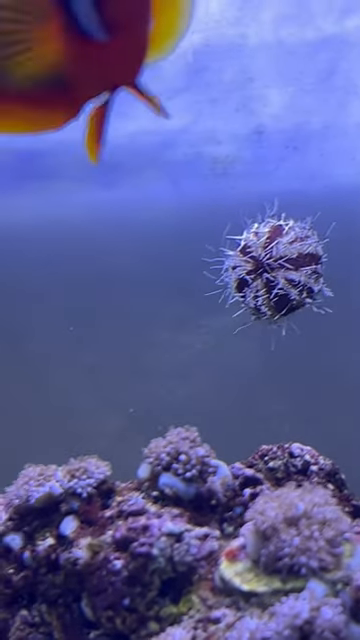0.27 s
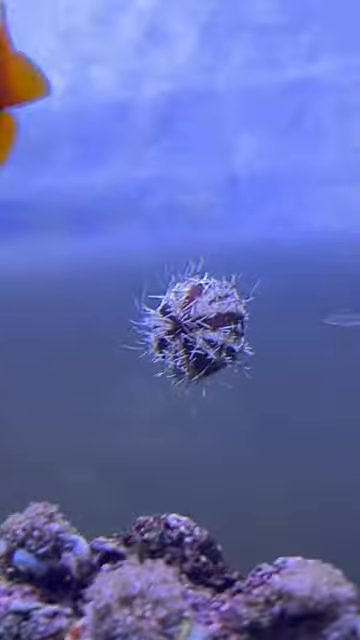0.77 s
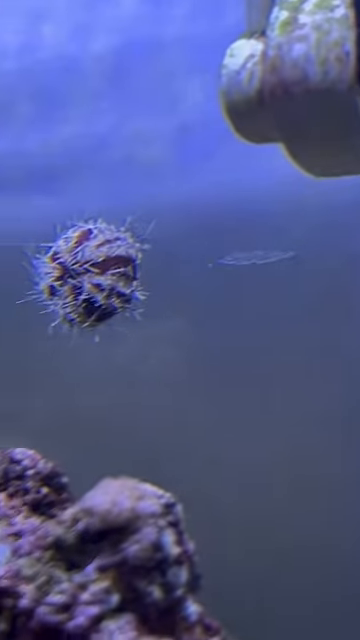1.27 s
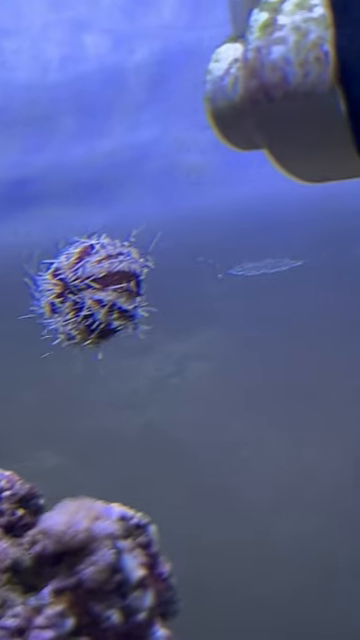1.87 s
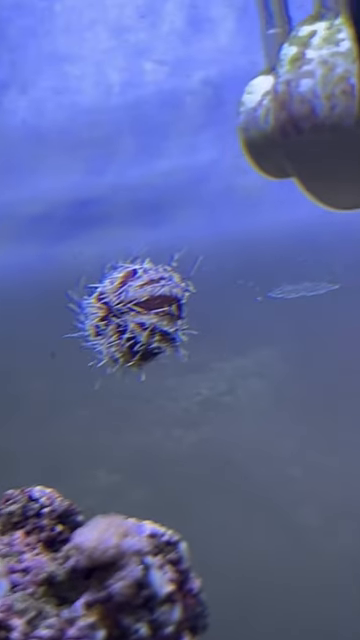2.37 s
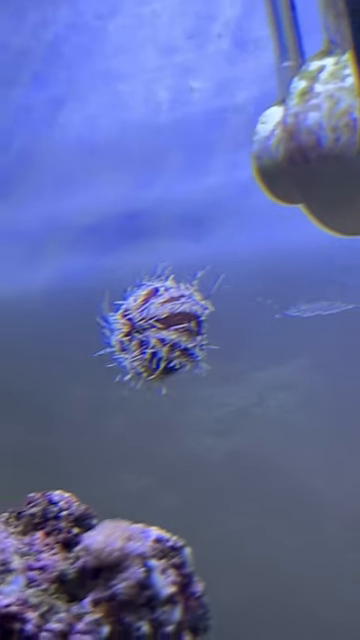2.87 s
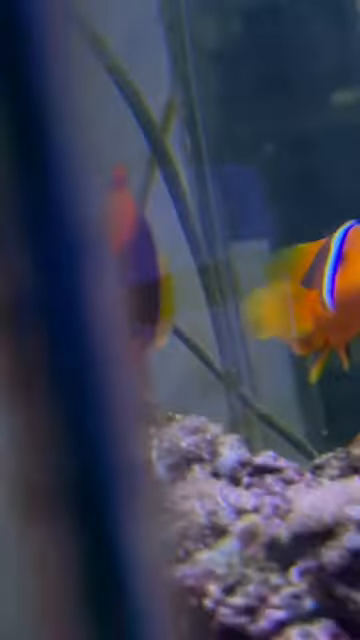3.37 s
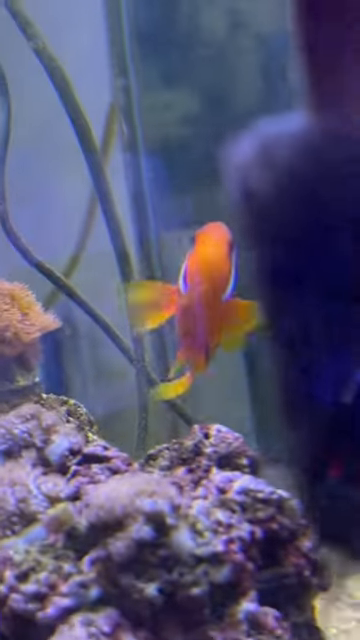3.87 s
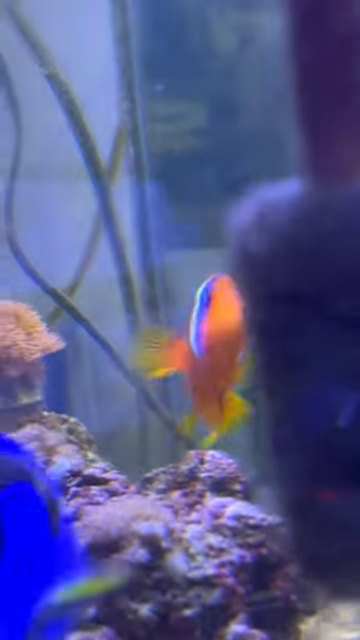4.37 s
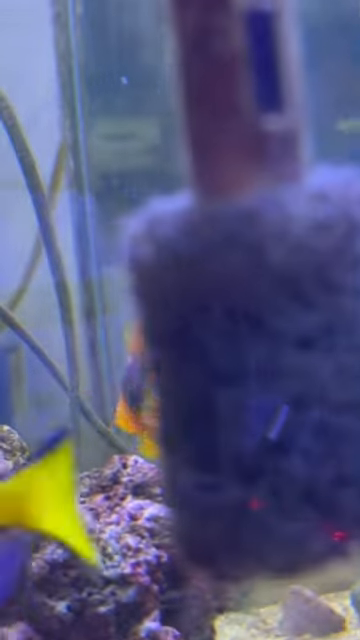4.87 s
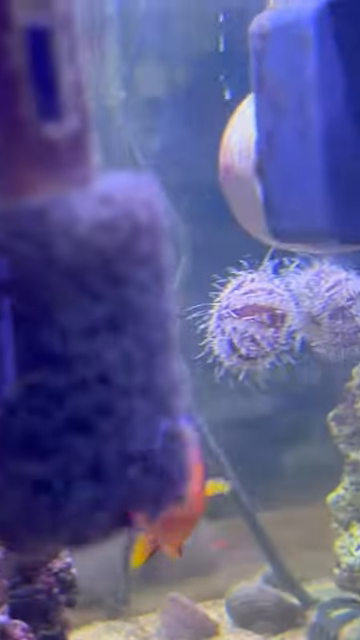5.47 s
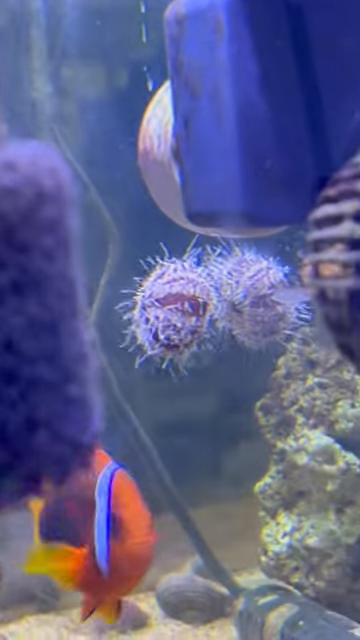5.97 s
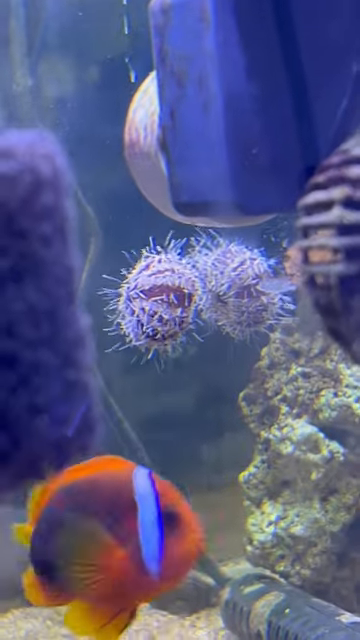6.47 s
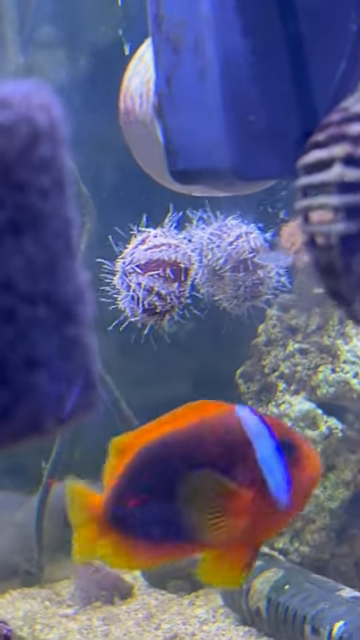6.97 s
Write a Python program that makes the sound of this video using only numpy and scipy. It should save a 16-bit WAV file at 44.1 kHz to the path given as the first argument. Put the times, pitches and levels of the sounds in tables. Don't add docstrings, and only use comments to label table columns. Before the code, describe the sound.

Close, deep electric pump hum with gentle running water; muffled through the walls, a heavy vehicle idles and accelerates with rising pitch near the end.

```python
import sys
import numpy as np
from scipy import signal
from scipy.fft import rfft, irfft
from scipy.io import wavfile
from scipy.ndimage import uniform_filter1d

SR = 44100
rng = np.random.default_rng(int(sys.argv[2]) if len(sys.argv) > 2 else 0)


def attenuation_scalar(level_db):
    decades = np.asarray(level_db, float) / 20
    return 10 ** decades


def store_wav(level_fs):
    pcm = np.round(np.clip(np.atleast_2d(level_fs), -1, 1) * 32767)
    wavfile.write(sys.argv[1], SR, pcm.T.astype(np.int16))


N = 317520

# multiple, front_glass_db, round_the_corner_db
PUMP_HUM = [(1, -36, -34), (2, -51.5, -50.5), (3, -68, -58), (4, -72.5, -72.5), (5, -64.5, -73),
            (6, -68.5, -69), (7, -76.5, -76.5)]
# pitch_hz, level_db
FAN_LINES = [(411, -76.5), (4738, -83), (9480, -101)]
# time_s, firing_level_db, load_db (load lifts the even orders)
ENGINE_EFFORT = [(0, -40, -4), (.4, -42, -7), (1.7, -44, -5), (2.2, -39, -12), (2.7, -41, -8),
                 (3.1, -48, -10), (3.72, -47, -3), (4.05, -52, 0), (4.25, -34, -18), (4.48, -34, -20),
                 (4.68, -47, -6), (4.92, -36, 3), (5.2, -36, 3), (5.5, -30, -12), (5.72, -35, 0),
                 (6.1, -35, 6), (6.5, -34, 7), (7, -35, 8.5)]
# time_s, turn_rate_hz
ENGINE_SPEED = [(0, 24.8), (3.3, 25), (3.72, 27.1), (3.88, 27), (4.2, 24.8), (4.45, 24.5), (4.8, 25),
                (5.0, 26.3), (5.28, 29.8), (6.12, 41.8), (6.5, 48), (7.2, 59)]
# order, level_db, share_of_load (0-1)
ENGINE_ORDERS = [(2, 1.5, 1), (3, 0, 0), (4, -1.5, 1), (6, -8, .3)]
# centre_s, length_s, order, level_db
ORDER_SWELLS = [(1, 5, 1, -50), (0, .2, 6, -44), (3.86, .2, 6, -38), (4.07, .18, 6, -40),
                (4.57, .25, 9, -46), (4.74, .18, 9, -50), (4.9, .4, 1, -49), (4.95, .2, 7, -50),
                (5.6, .5, 9, -53), (5.71, .1, 6, -45), (6.18, .14, 5, -45), (6.34, .14, 5, -44),
                (6.82, .12, 4, -43), (6.85, .2, 5, -48), (7.03, .28, 1, -31)]
# time_s, pitch_hz, level_db
GEAR_WHINE = [(3, 1068, -78), (3.6, 1102, -71.5), (4.4, 1111, -68.5), (4.55, 1103, -89), (5.3, 1111, -69),
              (6.2, 1101, -70), (6.5, 1040, -75), (6.9, 1037, -73), (7.2, 1049, -61)]
# centre_s, length_s, lift_db
WHINE_SWELLS = [
    (5.7, .16, 10),
    (5.84, .12, 9),
]
# pitch_hz, width_hz, gain_db
WALL_MODES = [(51, 16, -7), (74.5, 9, -1), (81.5, 6.5, 0), (95, 13, 1), (110, 11, 0), (150, 50, -20),
              (211, 14, -15)]
# start_s, level_db, middle_mode_db, upper_mode_db
KNOCKS = [
    (1.06, -29, -6, 1),
    (1.103, -33, -4, 2),
    (1.24, -24, 2, -6),
]
# pitch_hz, t60_s
STAND_MODES = [(176, .2), (198, .12), (260, .17)]
# start_s, peak_db, pitch_hz, t60_s
TICKS = [(1.61, -50, 1350, .06), (1.62, -50, 800, .08), (1.66, -53, 1250, .15), (1.74, -53, 1200, .1),
         (1.74, -62, 8800, .02), (1.92, -64, 8000, .02), (2.694, -39, 2600, .025), (2.695, -44, 3200, .025),
         (3.447, -39, 4950, .03), (3.447, -45, 3900, .015), (3.447, -50, 6200, .015),
         (3.478, -49, 4900, .02), (3.641, -59, 9000, .035), (3.645, -52, 800, .06), (3.767, -60, 8500, .02),
         (3.887, -53, 5500, .025), (4.262, -53, 8400, .035), (4.263, -64, 12000, .02),
         (5.97, -66, 12500, .03)]
# centre_s, length_s, lift_db
SLEEVE_RUBS = [(0, 0.036, 10), (1.17, 0.1, 7), (2.41, 0.041, 7.5), (2.575, 0.14, 17), (3.64, 0.03, 9),
               (3.9, .1, 4), (4.26, 0.045, 11), (4.46, 0.13, 9), (4.7, 0.38, 10), (5.8, 0.13, 2),
               (5.97, 0.084, 3)]
# pitch_hz, density_db (per Hz)
WATER_SPECTRUM = [(400, -13), (900, 1.5), (1400, -3.5), (2000, -0.7), (2600, -1.14), (3500, -3), (4800, -6),
                  (5800, -14.5), (7000, -23), (8500, -43.5)]
# pitch_hz, density_db (per Hz)
SPRAY_SPECTRUM = [(4500, -20), (5800, 1), (7000, -.5), (8200, -2.5), (9300, -4.5), (9900, -9), (10500, -16),
                  (12000, -35)]
# pitch_hz, width_hz, level_db
ROOM_BOOMS = [(25, 5, -21.5), (49, 24, -6.5), (62.24, 5.6, -6), (87.3, 6.4, 3), (100.55, 11, 3.5),
              (156.2, 19, -7.5), (216.4, 33, -14), (311.7, 17, -17.5), (417, 8.5, -24)]
# centre_s, length_s, lift_db
STREET_SURGES = [(.9, 0.13, 10.5), (1.3, .5, 7), (2.38, 0.28, 11), (3.45, .35, 8.5), (3.9, .6, 7.5),
                 (4.4, 0.87, 5), (4.91, 0.35, 8.5), (5.45, 0.48, 6), (5.9, 0.32, 6.5), (6.6, 0.4, 6),
                 (7.2, .3, 9.5)]
# pitch_hz, density_db (per Hz)
TYRE_SPECTRUM = [(1100, -26), (1500, 2), (1800, 4.5), (2150, -5.5), (2700, -26)]
# centre_s, length_s, lift_db
PASSING_CARS = [
    (.7, 0.36, 5),
    (1.7, .5, 3),
    (4.65, 0.54, 7),
]
# pitch_hz, density_db (per Hz)
AIR_SPECTRUM = [(20, -10), (40, 8.5), (130, -2), (200, -2), (320, -6.5), (500, -13.5), (750, -18.5),
                (1150, -26.5), (1600, -31.5), (2500, -66.5)]
# pitch_hz, density_db (per Hz)
HISS_SPECTRUM = [(8500, -28.5), (10000, -6), (12000, -1), (14500, 1.5), (15500, -5.5), (16000, -38.5)]
# time_s, nearness_db
NEARNESS = [(0, 0), (.7, 0.3), (1.1, 0), (1.45, -0.75), (2.2, -2.2), (2.85, -0.9), (3.2, 1.5), (4.2, 2.5),
            (4.65, 4), (5.05, 3.5), (5.6, 5), (6.05, 6.5), (6.3, 7), (6.95, 7.5), (7.2, 7.5)]
# pitch_hz, right_leads_rad, likeness (0-1), left_over_right_db
PORT_PAIR = [(100, 0, 1, .6), (200, .06, .99, 1.5), (400, .46, .9, 3), (700, 1.4, .4, 3),
             (1000, 1.3, .15, 3.5), (1200, .55, .6, 2), (1500, .3, .72, 1), (1900, -.7, .96, .6),
             (2550, -2.2, .96, 0), (3800, -.7, .93, 0), (4800, -1.4, .93, 0), (5450, -3.14, .99, 0),
             (7550, -6.28, .99, 0), (10150, -9.42, .99, 0)]


def pump():
    hz = 119.85 + 0.069 * drift(hz=1.6)
    corner_s, swing_s = 3.06, 0.25
    corner = np.clip((np.arange(N) / SR - corner_s) / swing_s + 0.5, 0, 1)
    hum = np.zeros(N)
    for multiple, front_db, side_db in PUMP_HUM:
        level_db = front_db + (side_db - front_db) * corner + 0.6 * drift(hz=3.4)
        hum += tone(round(multiple) * hz, level_db)
    return hum


def fan():
    return sum(tone(hz + 1.5 * drift(hz=3.4), db + 0.84 * drift(hz=0.92)) for hz, db in FAN_LINES)


def engine():
    firing_db, load_db = curves(ENGINE_EFFORT)
    turn_hz = uniform_filter1d(curves(ENGINE_SPEED)[0], size=3000) * (1 + 0.005 * drift(hz=6))
    out = np.zeros(N)
    for order, db, share in ENGINE_ORDERS:
        hz = round(order) * turn_hz
        level_db = firing_db + db + share * load_db + 1.2 * drift(hz=12)
        out += walls(hz) * tone(hz, level_db)
    for s, length, order, db in ORDER_SWELLS:
        out += swell(s, length) * tone(round(order) * turn_hz, db)
    return out


def walls(hz):
    peaks = sum(attenuation_scalar(db) * np.exp(-(2 * (hz - f) / width) ** 2) for f, width, db in WALL_MODES)
    return attenuation_scalar(-28) + peaks


def gears():
    hz, level_db = curves(GEAR_WHINE)
    level_db = level_db + lifts(WHINE_SWELLS)
    fuzz = resonate(resonate(rng.standard_normal(N), hz, 24), hz, 24)
    return 0.45 * attenuation_scalar(level_db) * evened(fuzz) + tone(hz + 8 * drift(hz=8), level_db - 1.0)


def knocks():
    out, t = np.zeros(N + SR), np.arange(SR // 4) / SR
    padding = 1 - np.exp(-(t / 0.009) ** 2)
    for s, db, *upper_db in KNOCKS:
        ring = np.zeros(len(t))
        for lift, (hz, t60) in zip((0, *upper_db), STAND_MODES):
            ring += attenuation_scalar(lift - 60 * t / t60) * np.sin(2 * np.pi * hz * t)
        out[round(s * SR):][:len(t)] += attenuation_scalar(db) * ring * padding
    return out[:N]


def ticks():
    out, t = np.zeros(N + SR), np.arange(SR // 4) / SR
    onset = 1 - np.exp(-t / 0.0008)
    for s, db, hz, t60 in TICKS:
        cluster = sum(np.sin(2 * np.pi * hz * ratio * t) for ratio in (0.95, 1, 1.06)) / 3
        out[round(s * SR):][:len(t)] += attenuation_scalar(db - 60 * t / t60) * cluster * onset
    return out[:N]


def water():
    wash = noise(WATER_SPECTRUM, 1400, 4500, patchy_db=0.74, flicker_db=0.63)
    return approach(-62, 0.97) * wash


def spray():
    hiss = noise(SPRAY_SPECTRUM, 5770, 9000, patchy_db=1.8, flicker_db=0.1)
    return approach(-80, 1.46, 0.44 * lifts(SLEEVE_RUBS)) * hiss


def booms():
    pair = np.zeros((2, N))
    for side in pair:
        for hz, width, db in ROOM_BOOMS:
            ring = resonate(resonate(rng.standard_normal(N), hz, width), hz, width)
            side += attenuation_scalar(db) * evened(ring)
    return approach(-53, 1.02, lifts(STREET_SURGES)) * pair


def tyres():
    rolling = noise(TYRE_SPECTRUM, 1100, 2700, patchy_db=1.5, flicker_db=0.3)
    return approach(-75, 1.3, lifts(PASSING_CARS)) * rolling


def room_air():
    return approach(-57.5, 0.78) * noise(AIR_SPECTRUM, 380, 1000, patchy_db=1.64, flicker_db=-0.8)


def microphone_hiss():
    hiss = noise(HISS_SPECTRUM, 11300, 13500, patchy_db=2.0, flicker_db=-0.5)
    return approach(-101.5, 0.3, lifts(SLEEVE_RUBS)) * hiss


def ports(direct, diffuse):
    room = np.vstack([direct, diffuse])
    room = np.pad(room, ((0, 0), (4096, 4096)), "reflect", reflect_type="odd")
    n = room.shape[1]
    taper = signal.windows.tukey(n, 8192 / n)
    hz = np.fft.rfftfreq(n, 1 / SR)
    beyond_hz = np.maximum(hz - PORT_PAIR[-1][0], 0)
    lead = read(PORT_PAIR, hz) - 2 * np.pi * 2.2e-4 * beyond_hz
    same = read(PORT_PAIR, hz, axis=2)
    tilt = attenuation_scalar(read(PORT_PAIR, hz, axis=3) / 2)
    near, a, b = rfft(room * taper, axis=1)
    left = (near + a) * tilt * np.exp(-0.5j * lead)
    right = (near + same * a + np.sqrt(1 - same ** 2) * b) / tilt * np.exp(0.5j * lead)
    return irfft(np.array([left, right]), n, axis=1)[:, 4096:-4096]


def approach(level_db, per_near_db, lift_db=0):
    return attenuation_scalar(level_db + per_near_db * curves(NEARNESS)[0] + lift_db)


def swell(s, length):
    return np.exp(-(2 * (np.arange(N) / SR - s) / length) ** 2)


def lifts(rows):
    return sum(db * swell(s, length) for s, length, db in rows)


def evened(x):
    return x / np.sqrt(np.mean(abs(x) ** 2) + 1e-20)


def curves(rows):
    s, *columns = np.transpose(rows)
    return [np.interp(np.arange(N) / SR, s, c) for c in columns]


def read(points, hz, axis=1):
    table = np.array(points)
    return np.interp(np.log(hz + 1), np.log(table[:, 0] + 1), table[:, axis])


def drift(hz):
    z = rfft(rng.standard_normal(N))
    return evened(irfft(z / (1 + (np.fft.rfftfreq(N, 1 / SR) / hz) ** 4), N))


def resonate(x, hz, width):
    turn = np.exp(2j * np.pi * np.cumsum(hz * np.ones(len(x))) / SR)
    r = np.exp(-np.pi * width / SR)
    return 2 * (turn * signal.lfilter([1 - r], [1, -r], x / turn)).real


def tone(hz, db):
    return np.sqrt(2) * attenuation_scalar(db) * np.sin(2 * np.pi * (np.cumsum(hz) / SR + rng.random()))


def noise(spectrum, lo_hz, hi_hz, patchy_db, flicker_db):
    frames, hz = N // 256 + 5, np.fft.rfftfreq(1024, 1 / SR)
    a, b, c, d, patches = rng.standard_normal((frames, 513, 5)).T
    flicker = evened(uniform_filter1d(patches[0], size=3))
    patches = uniform_filter1d(patches, size=12, axis=0)
    patches = evened(uniform_filter1d(patches, size=12, axis=1))
    gain = attenuation_scalar(read(spectrum, hz))
    unrest = attenuation_scalar(patchy_db * patches + flicker_db * flicker)
    z = np.array([a + 1j * b, c + 1j * d]) * gain[:, None] * unrest
    inside = (hz > lo_hz) & (hz < hi_hz)
    share = np.sqrt(np.sum(gain[inside] ** 2) / np.sum(gain ** 2))
    return evened(signal.istft(z, nperseg=1024, noverlap=768)[1][:, :N]) / share


def scene():
    direct = pump() + fan() + engine() + gears()
    diffuse = water() + spray() + booms() + tyres() + room_air() + microphone_hiss()
    touch = ports(knocks() + ticks(), np.zeros((2, N))) * attenuation_scalar(np.array([[1.2], [-1.2]]))
    return ports(direct, diffuse) + touch


def top_cut(x):
    return signal.sosfilt(signal.butter(12, 15700, fs=SR, output="sos"), x)


def record(dry):
    cut = signal.sosfilt(signal.butter(2, 20, "high", fs=SR, output="sos"), dry)
    cut = cut * np.minimum(np.arange(N, 0, -1) / 16, 1)
    return top_cut(cut)


dry = scene()
out = record(dry)
store_wav(out)
```